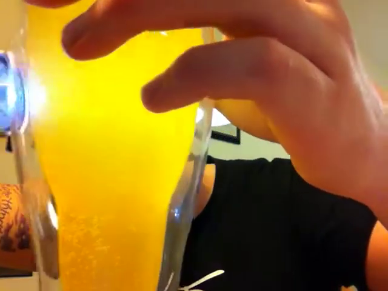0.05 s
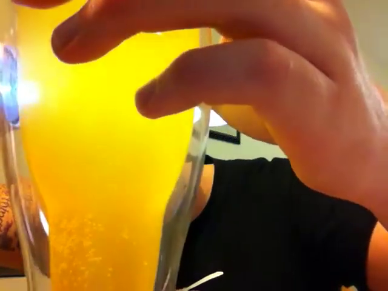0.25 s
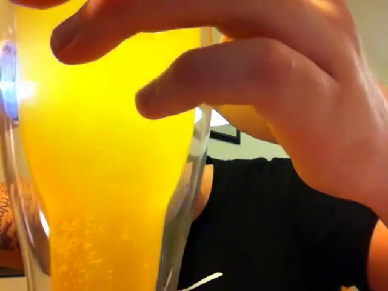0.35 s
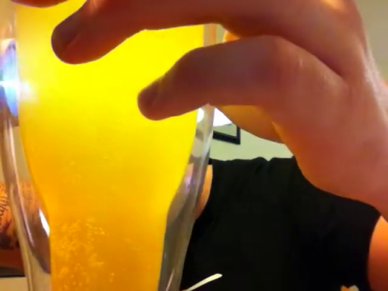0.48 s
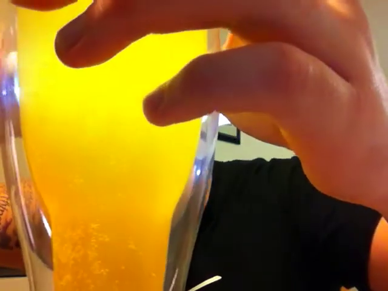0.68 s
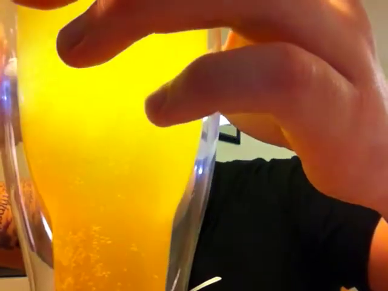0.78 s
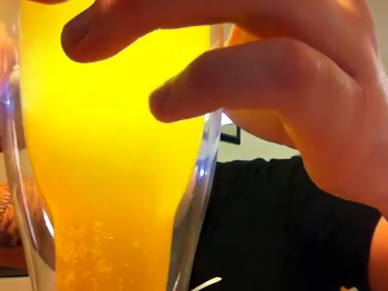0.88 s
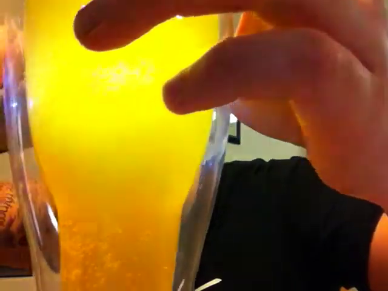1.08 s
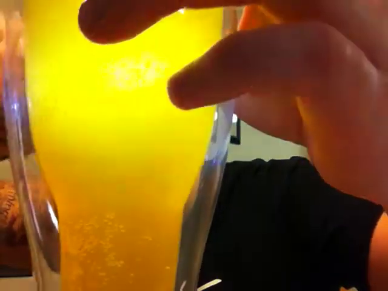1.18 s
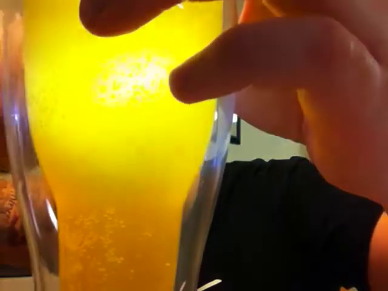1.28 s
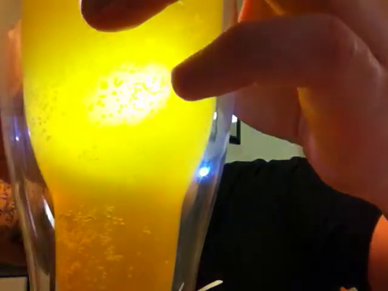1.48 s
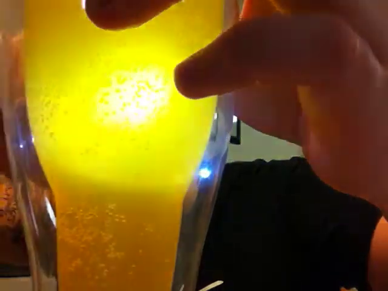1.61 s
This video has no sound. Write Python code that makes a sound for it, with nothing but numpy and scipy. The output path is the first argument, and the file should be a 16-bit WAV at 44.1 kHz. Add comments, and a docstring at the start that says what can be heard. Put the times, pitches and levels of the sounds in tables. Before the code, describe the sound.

Sharp clinks come from a hand-held glass of beer, tapped four times in quick succession with a small torch. The first is loudest and chatters slightly. The ringing dies quickly, then fingers rub faintly in the quiet room.

```python
"""A faint swell of hiss rises over the steady noise of a quiet room. From 0.24 to 0.75 s a small torch
knocks four clinks from a hand-held glass full of beer, each with a short low thud. Each impact excites
two low wall modes, damped by drink and fingers, and bright, short upper modes; the harder ones chatter.
The small room answers with early reflections and a brief reverberant tail.
A very faint fifth touch comes at 0.94 s, and a few soft rubs follow as the grip shifts."""
import sys
import numpy as np
from scipy import signal
from scipy.fft import rfft, irfft, next_fast_len
from scipy.io import wavfile

SR = 44100
rng = np.random.default_rng(int(sys.argv[2]) if len(sys.argv) > 2 else 0)


def to_wav(sig):
    """Store sig (one row per channel, or 1-D mono) as 16-bit WAV at the path in sys.argv[1].

    Samples outside -1..1 are clipped; the rate is SR.
    """
    pcm = np.clip(np.atleast_2d(sig), -1, 1) * 32767
    pcm = np.round(pcm).astype(np.int16)
    wavfile.write(sys.argv[1], SR, pcm.T)  # frames by channels


N = 72765
TOP_HZ = 15900


def undb(db):
    """Amplitude ratio: tenfold for every 20 dB."""
    return 10 ** (np.asarray(db) / 20)


def fade(t, t60):
    """Exponential decay, 60 dB down after t60 seconds."""
    return np.exp(-np.log(1000) * t / max(t60, 1e-3))


def ring(t, hz, t60):
    """Free vibration of one mode: a damped sinusoid."""
    return np.sin(2 * np.pi * hz * t) * fade(t, t60)


def delay(x, seconds):
    """A pure time delay."""
    return np.concatenate([np.zeros(max(int(round(seconds * SR)), 0)), x])[:N]


def colour(x, points):
    """Minimum-phase filtering through (frequency_hz, gain_db) points."""
    size = next_fast_len(2 * N)
    hz, db = np.array(points, float).T
    bins_hz = np.arange(size // 2 + 1) * SR / size + 1
    log_gain = np.log(undb(np.interp(np.log(bins_hz), np.log(hz), db)))
    cepstrum = irfft(log_gain, size)
    cepstrum[1:size // 2] *= 2  # folding makes the filter causal
    cepstrum[size // 2 + 1:] = 0
    return irfft(rfft(x, size) * np.exp(rfft(cepstrum)), size)[:N]


# Spectral shape of the noise floor: frequency_hz, gain_db
NOISE_SPECTRUM = [(18, -62), (30, -32), (108, -26.5), (140, -9), (225, -7), (284, -3), (410, -11),
                  (492, -11), (852, -16.5), (1170, -11.5), (1440, -18.5), (1820, -20.5), (4420, -27),
                  (15500, -30.5)]
def background(level_db=-61.5):
    """Stationary random noise: low room sound and hiss."""
    noise = colour(rng.standard_normal(N), NOISE_SPECTRUM)
    return noise / np.std(noise) * undb(level_db)


# A faint swell of hiss near 1850 Hz at the start, then finger rubs on the glass:
# middle_s, half_length_s, centre_hz, width_octaves, level_db
SWELLS = [(0.051, 0.078, 1850, .5, -69.5), (0.938, 0.012, 7750, 0.88, -66),
          (0.959, 0.0036, 8130, 0.56, -63.5), (1.347, 0.012, 1980, 0.4, -66.5),
          (1.447, 0.0022, 7400, 0.78, -62)]
def hiss_and_rubs(t):
    """Amplitude-modulated noise bands: an opening hiss, later the friction of a shifting grip."""
    swells = np.zeros(N)
    bins_hz = np.arange(N // 2 + 1) * SR / N + 1
    for middle_s, half_length_s, centre_hz, width_octaves, level_db in SWELLS:
        band = np.exp(-.5 * (np.log2(bins_hz / centre_hz) / width_octaves) ** 2)
        noise = irfft(rfft(rng.standard_normal(N)) * band, N)
        envelope = np.exp(-.5 * ((t - middle_s) / half_length_s) ** 2)
        swells += undb(level_db) * noise / np.std(noise) * envelope
    return swells


# Knocks, rebounds and a last faint touch: start_s, low_hz, low_db, low_t60_s,
# main_hz, main_db, main_t60_s, contact_db, tilt_db_per_octave, edge_db, thud_db
IMPACTS = [(0.2380, 1090, -10.5, 0.052, 1594, -9, 0.076, -17.5, 3.25, -5, -55),
           (0.2791, 1060, -27.5, .055, 1618, -33.5, .22, -36, 0.5, -3, -80),
           (0.4779, 1073, -26, 0.15, 1583, -31, 0.22, -33, 1.5, 6.5, -60.5),
           (0.497, 1104, -29.5, 0.084, 1606, -31.5, 0.12, -38.5, -2, -1, -72),
           (0.687, 1070, -40.5, 0.064, 1584, -43, 0.46, -57, -3, 8, -64),
           (0.7470, 1110, -21, 0.045, 1620, -32, .15, -34, 1, -10, -60.5),
           (0.935, 1116, -57, 0.13, 1560, -57, 0.052, -78, -5, 3, -97)]
def knocks(t, low_swell_s=0.0042, main_swell_s=0.0018, choke_t60_s=0.019):
    """Impulse excitation: each impact damps the wall and rings it anew; a short low thud comes with it."""
    wall, ticks, thuds = np.zeros((3, N))
    hollow_note = undb(8.5) * ring(t, hz=299, t60=0.053)
    thud = ring(t, hz=67.5, t60=0.026) + hollow_note
    for (start_s, low_hz, low_db, low_t60_s, main_hz, main_db, main_t60_s,
         contact_db, tilt, edge_db, thud_db) in IMPACTS:
        low = undb(low_db) * ring(t, low_hz, low_t60_s) * (1 - np.exp(-t / low_swell_s))
        main = undb(main_db) * ring(t, main_hz, main_t60_s) * (1 - np.exp(-t / main_swell_s))
        wall *= fade(np.maximum(t - start_s, 0), choke_t60_s)
        wall += delay(low + main, start_s)
        ticks += delay(undb(contact_db) * contact(t, tilt, edge_db), start_s)
        thuds += delay(undb(thud_db) * thud, start_s)
    return wall + ticks, thuds


# Weaker modes of the glass: pitch_hz, level_db, t60_s
WEAK_MODES = [(700, -16, .075), (780, -13, .085), (1435, -16, .07), (1535, -10, .05), (1725, -9, .09),
              (1915, -15, .06), (2030, -19, .06), (4170, -16, .04), (5000, -14, .02), (6170, -13, .02),
              (6400, -14, .016), (10380, -18, .02)]
# Spectral shape of the contact noise: frequency_hz, gain_db
CRACK_SPECTRUM = [(560, -26), (740, 0.5), (900, 4), (2200, 5), (2700, -4), (3300, -10.5), (3800, -5.5),
                  (4200, 1.5), (4650, -6), (5100, -0.5), (5650, -5), (6300, 4), (7200, -22.5), (8000, 1.5),
                  (8900, -5.5), (9700, -7.5), (10400, -16), (11100, -17.5), (13200, -16), (14000, -16.5),
                  (16000, -28.5)]
def contact(t, tilt_db_per_octave, edge_db, pivot_hz=5000, edge_hz=8330, edge_octaves=0.21):
    """Broadband excitation: brief metal contact gives a crack, a sizzle of dense modes and weak tones."""
    modes = sum(undb(db) * ring(t, hz, t60) for hz, db, t60 in WEAK_MODES)
    crack = undb(1.5) * fade(t, t60=0.0065)
    sizzle = undb(-8) * fade(t, t60=0.025)
    burst = colour(rng.standard_normal(N) * (crack + sizzle), CRACK_SPECTRUM)
    hz = np.geomspace(500, TOP_HZ, 40)
    metallic_edge = np.exp(-.5 * (np.log2(hz / edge_hz) / edge_octaves) ** 2)
    brightness_db = tilt_db_per_octave * np.log2(hz / pivot_hz) + edge_db * metallic_edge
    return colour(modes + burst, np.c_[hz, brightness_db])


def cut_bass(x, cutoff_hz=600):
    """High-pass: the clinks and their ticks carry little sound below about 600 Hz."""
    return signal.sosfilt(signal.butter(4, cutoff_hz, "highpass", fs=SR, output="sos"), x)


# Near surfaces: delay_s, gain_db
REFLECTIONS = [(.00985, -9.5), (0.021, -19.5), (0.0391, -19)]
# Spectral shape of the tail: frequency_hz, gain_db
TAIL_SPECTRUM = [(200, -27), (550, -27), (750, -16), (1100, -18), (1600, -16), (2000, -16.5), (3000, -6.5),
                 (4200, -10.5), (6200, -12), (10000, -16.5), (16000, -17)]
def room(x, t, t60_s=0.27, build_s=0.002, dull_hz=5000):
    """Reverberation: dull early reflections and a diffuse field that decays exponentially."""
    tail = rng.standard_normal(N) * fade(t, t60_s) * (1 - np.exp(-t / build_s)) ** 2
    tail = colour(tail / np.sqrt(np.sum(tail ** 2)), TAIL_SPECTRUM)
    bins_hz = np.arange(N // 2 + 1) * SR / N
    dull = irfft(rfft(x) / np.hypot(1, bins_hz / dull_hz), N)
    early = sum(undb(gain_db) * delay(dull, delay_s) for delay_s, gain_db in REFLECTIONS)
    return signal.fftconvolve(x, tail)[:N] + early


# Light touches of metal on glass: start_s, level_db, tilt_db_per_octave, edge_db
BOUNCES = [(0.2623, -30, 1.5, 0), (0.2668, -40, 3.5, 5), (0.2703, -34, 2, 12), (0.4876, -46.5, 10, -3)]
def chatter(t):
    """Contact bounce: after a hard knock the torch ticks lightly against the wall."""
    return sum(delay(undb(level_db) * contact(t, tilt, edge_db), start_s)
               for start_s, level_db, tilt, edge_db in BOUNCES)


def scene():
    """Superposition of direct sound, reverberation and noise floor, in mono."""
    t = np.arange(N) / SR
    clinks, thuds = knocks(t)
    direct = cut_bass(clinks + chatter(t)) + thuds + hiss_and_rubs(t)
    return (direct + room(direct, t) + background())[None]


def record(dry):
    """Band limiting: a steep low-pass filter cuts the treble above TOP_HZ."""
    return signal.sosfilt(signal.ellip(10, .2, 70, TOP_HZ, fs=SR, output="sos"), dry)


dry = scene()
out = record(dry)
to_wav(out)
```